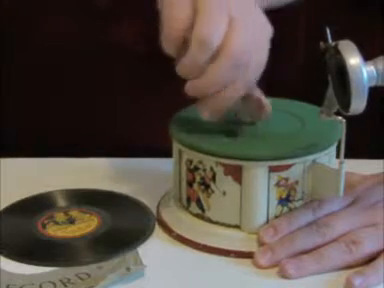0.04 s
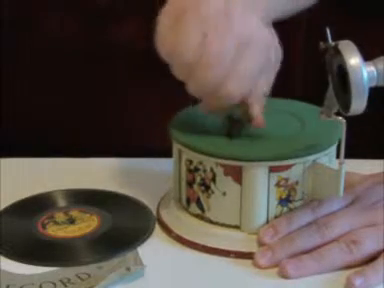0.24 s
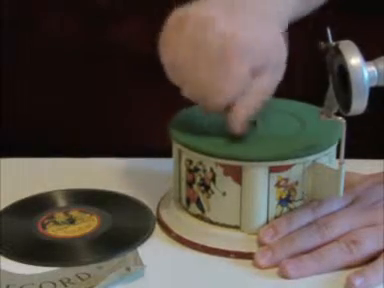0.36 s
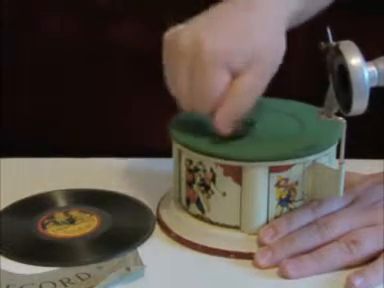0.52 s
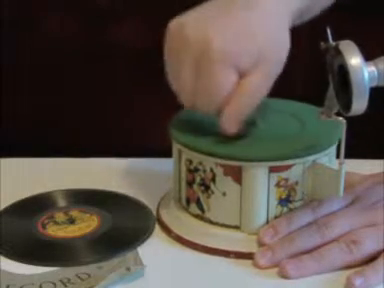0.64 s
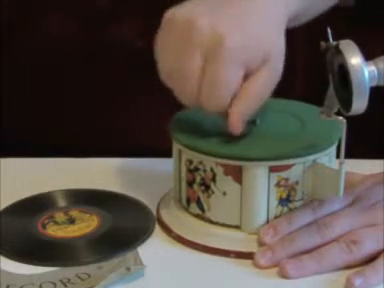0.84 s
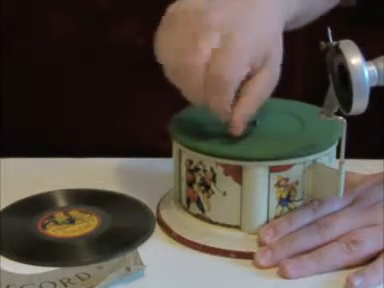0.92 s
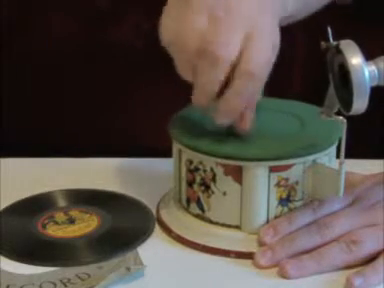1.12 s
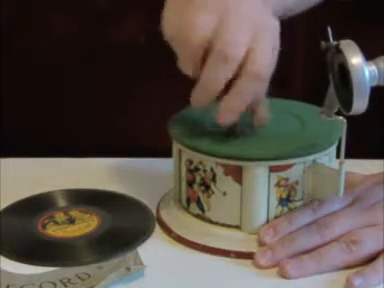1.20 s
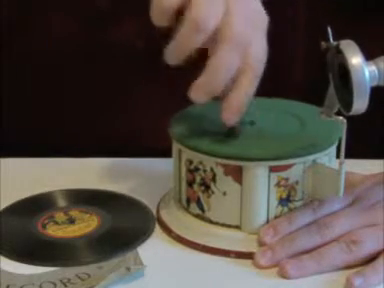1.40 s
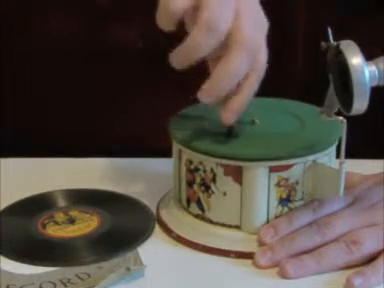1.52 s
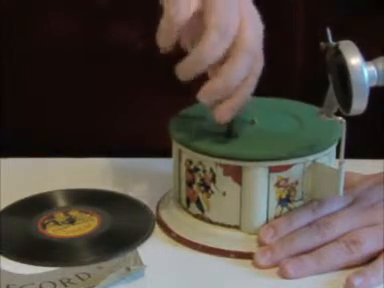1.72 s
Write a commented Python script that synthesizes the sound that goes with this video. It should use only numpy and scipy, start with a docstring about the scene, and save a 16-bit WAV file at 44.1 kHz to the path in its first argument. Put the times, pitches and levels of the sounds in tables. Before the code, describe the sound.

Sharp, clanking ratchet clicks and soft key knocks as a tin toy gramophone is wound.

```python
"""Sharp tin clanks, close by: a hand winds the spring motor of a toy gramophone on a table.
One twist of the key drops the pawl over four ratchet teeth; each snap rings the tin case and fills
the small, live room. Before and after, the fingers shift their grip and the loose key knocks softly,
while the toy bumps the table now and then. Mains hum and faint hiss lie underneath.
Nearly mono, with a faint, uneven stereo spread."""
import sys
import numpy as np
from scipy import signal
from scipy.fft import rfft, irfft, next_fast_len
from scipy.io import wavfile

SR = 44100
rng = np.random.default_rng(int(sys.argv[2]) if len(sys.argv) > 2 else 0)


def dump(signal):
    """Clip the signal to [-1, 1] and save it as 16-bit WAV at the path in sys.argv[1]."""
    limited = np.clip(np.atleast_2d(signal).T, -1, 1)
    pcm = np.round(limited * 32767).astype(np.int16)
    wavfile.write(sys.argv[1], SR, pcm)


N = 77175
TAIL = 32768  # samples given to one sound to die away
SNAP_RISE_S, SNAP_HOLD_S, SNAP_T60_S = 0.0023, 0.0045, 0.013


def ratchet():
    """The pawl snaps off each tooth: a crack, a clank and a ring, changing colour as the wheel turns."""
    # The second tooth catches twice. Each row: start in seconds, direct and room gains in dB,
    # low clank in Hz and its dB, high clank in Hz and its dB, then a tint in dB at each of tint_hz.
    snaps = [(0.2077, -16, -18.5, 1524, -24, 2200, -29, -5, 4, -4.5, 5, 5.5, 3.5, 0.65, -1.9, -3.1),
             (0.3368, -19.5, -24.5, 518, -36, 2083, -28.5, 10, 7, 0, -6, 11, 0, 2.1, -0.13, -3.1),
             (0.353, -20, -21, 1580, -31, 3198, -23, -4, 7.5, -4, 3, -1, 3.5, 2.1, -0.81, -4.2),
             (0.4613, -13.5, -19, 757, -22.5, 3960, -29, -0.5, -0.5, -2, -2, -0.5, 0.5, 0.41, 0.32, -0.97),
             (0.6100, -17.5, -19, 675, -26, 4780, -25, 0.5, 0.5, 0, -4, -6, -1, 0.4, -0.77, 1)]
    # Where the tint of a snap is set, in Hz.
    tint_hz = [330, 480, 700, 1050, 1900, 2700, 3900, 6500, 10200]
    # Colour of the direct sound. Each row: frequency in Hz, gain in dB.
    direct_colour = [(500, 3), (4000, 2), (5600, -5), (6800, 2), (8200, -18), (10200, 2.5), (12000, -6.5)]
    # Colour of the snapped tin case. Each row: frequency in Hz, gain in dB.
    case_colour = [(59, -46), (100, -40), (135, -24), (179, -28), (368, -22.5), (477, -11.5), (517, -11.5),
                   (644, -1.5), (698, -12.5), (756, -5.5), (924, -4), (1040, -7), (1220, -5), (2230, -6.5),
                   (2470, -11.5), (3830, -5), (5280, -11.5), (10200, -8.5), (12000, -14.5), (15600, -41),
                   (22000, -120)]
    clank_t60_s, ring_db = 0.026, -18.5
    sheet_hz = rng.uniform(4280, 12150, size=44)
    out = np.zeros(N)
    for start, direct_db, room_db, low_hz, low_db, high_hz, high_db, *tint_db in snaps:
        chatter = contact(SNAP_RISE_S, SNAP_HOLD_S, SNAP_T60_S)
        direct = coloured(chatter, lambda hz: direct_db + along(direct_colour, hz))
        crack = coloured(direct + amp(room_db) * room(), lambda hz: along(case_colour, hz))
        clank = amp(low_db) * mode(low_hz, clank_t60_s, SNAP_RISE_S)
        clank += amp(high_db) * mode(high_hz, clank_t60_s, SNAP_RISE_S)
        ringing = amp(room_db + ring_db) * (case_ring() + shimmer(sheet_hz))
        tint = list(zip(tint_hz, tint_db))
        add(out, start, coloured(crack + clank + ringing, lambda hz: along(tint, hz)))
    return out


def case_ring(scatter_db=2):
    """The modes of case and spring, struck a little differently each time."""
    # Each row: pitch in Hz, relative level in dB, seconds to fall 60 dB.
    modes = [(480.7, -19.5, 0.66), (551, -20.5, 0.55), (682, -12.5, 0.23), (751.6, -2.5, 0.25),
             (1051.2, -2, 0.29), (1430, -12.5, 0.15), (1548, -2, 0.15), (1903, 2.5, 0.083),
             (2149, -21, 1.0), (2275, 0.5, 0.17), (3154, -7.5, 0.35), (3910, -19, 0.66),
             (3890, -10.5, 0.44), (3990, -16, 0.4), (4345, -15, 0.31), (7180, -4.5, 0.19), (10600, -14, .2)]
    return sum(amp(db + scatter_db * rng.standard_normal()) * mode(hz, t60_s, SNAP_RISE_S)
               for hz, db, t60_s in modes)


def shimmer(pitches_hz):
    """The thin tin sheet's high modes, each snap sharing its energy among them anew."""
    return amp(-15) * sum(rng.standard_normal() * mode(hz, t60_s=0.23, rise_s=0.0061)
                          for hz in pitches_hz)


def key_knocks():
    """Fingers nudge the slack key: dull knocks on the same case, each leaving one tone ringing."""
    # Each row: start in seconds, gain in dB, rise in seconds, brightness in dB per octave,
    # the tin's tone in Hz, its gain against the knock in dB.
    knocks = [(0.061, -41, 0.0058, -2, 490.5, -11.5), (0.161, -31.5, 0.0035, -1, 612.4, -22.5),
              (0.832, -37.5, 0.0014, 1, 581, -19.5), (0.848, -42.5, 0.0044, 0, 579.5, -10),
              (1.013, -41.5, 0.0047, -2.5, 310, -21.5), (1.111, -36, 0.0024, 0.5, 809, -23),
              (1.215, -41, 0.0027, 1.5, 611, -15), (1.268, -48, .004, -0.5, 3130, -22),
              (1.316, -48.5, 0.0046, -3, 547, -14.5), (1.451, -42, 0.0037, -2.5, 545, -15.5),
              (1.494, -59, 0.0068, 7, 553, -13), (1.54, -42, 0.002, -2, 474, -22.5),
              (1.629, -48, 0.0031, 1, 606, -15), (1.682, -47.5, 0.0033, 2, 575, -14),
              (1.701, -39, 0.0022, 0.5, 1840, -23), (1.733, -43.5, 0.0028, 2.5, 580, -19)]
    # Colour of the softly knocked case. Each row: frequency in Hz, gain in dB.
    knock_colour = [(60, -29), (140, -10.5), (220, -10.5), (380, -6), (490, 5), (590, 3), (680, 1),
                    (850, -0.5), (1150, -3.5), (2100, -8), (2600, -18), (3150, -14.5), (5000, -40.5),
                    (12000, -31.5)]
    room_db, ring_db, pivot_hz = -6, -22, 750
    out = np.zeros(N)
    for start, db, rise_s, slope_db, tone_hz, tone_db in knocks:
        chatter = contact(rise_s, hold_s=0.0027, t60_s=0.028)
        knock = chatter + amp(room_db) * room() + amp(ring_db) * case_ring()
        dull_knock = coloured(knock, lambda hz: along(knock_colour, hz)
                              + slope_db * np.log2(np.maximum(hz, 250) / pivot_hz))
        tone = amp(tone_db) * mode(tone_hz, t60_s=0.43, rise_s=rise_s)
        add(out, start, amp(db) * (dull_knock + tone))
    return out


def table_bumps():
    """The twisting hand rocks the toy on the table: faint low thuds."""
    # Each row: start in seconds, level in dB.
    bumps = [(0.087, -61), (0.302, -52), (0.383, -61), (0.487, -55), (0.611, -59), (0.712, -61),
             (0.843, -61), (1.02, -62.5)]
    out = np.zeros(N)
    for start, db in bumps:
        add(out, start, amp(db) * mode(hz=142, t60_s=0.14, rise_s=0.005))
    return out


def room():
    """The small room answers one contact: it fills, then each frequency dies at its own speed."""
    # Each row: frequency in Hz, seconds to fall 60 dB.
    decay_times = [(150, 0.46), (530, 0.43), (1400, 0.38), (3700, .34), (7000, .28), (11000, 0.19)]
    first_wall_s, fill_s = 0.007, 0.0047
    hz, t, spectrum = signal.stft(rng.standard_normal(TAIL), SR, nperseg=256)
    fade = amp(-60 * np.maximum(t - first_wall_s - fill_s, 0) / along(decay_times, hz)[:, None])
    reverb = signal.istft(spectrum * fade, SR, nperseg=256)[1][:TAIL]
    build_up = np.clip((np.arange(TAIL) / SR - first_wall_s) / fill_s, 0, 1)
    return reverb * build_up


def hum_and_hiss():
    """Steady mains hum and faint hiss under everything."""
    # Mains lines. Each row: frequency in Hz, rms level in dB.
    hum_lines = [(48.4, -81), (150.7, -76.5), (247.6, -77), (349.9, -80)]
    # Colour of the hiss. Each row: frequency in Hz, gain in dB.
    hiss_colour = [(18, -12), (30, -10), (95, -21), (149, -4.5), (197, -35), (240, -14), (301, -5.5),
                   (578, -4.5), (885, -6.5), (1050, -8), (12000, -21.5), (15600, -44), (22000, -120)]
    t = np.arange(N) / SR
    hum = sum(np.sqrt(2) * amp(db) * np.sin(2 * np.pi * (hz * t + rng.random())) for hz, db in hum_lines)
    hiss = coloured(rng.standard_normal(N), lambda hz: along(hiss_colour, hz) - 50)
    return hum + hiss


def contact(rise_s, hold_s, t60_s):
    """The brief chatter of two parts meeting."""
    t = np.arange(TAIL) / SR
    decay = amp(-60 * np.maximum(t - hold_s, 0) / t60_s)
    return rng.standard_normal(TAIL) * np.minimum(t / rise_s, 1) * decay


def mode(hz, t60_s, rise_s):
    """One struck resonance."""
    t = np.arange(TAIL) / SR
    envelope = np.minimum(t / rise_s, 1) * amp(-60 * t / t60_s)
    return envelope * np.sin(2 * np.pi * (hz * t + rng.random()))


def amp(db):
    """Decibels to gain."""
    return 10 ** (np.asarray(db) / 20)


def along(points, hz):
    """A curve of (Hz, value) points, read on a log frequency axis."""
    point_hz, values = np.transpose(points)
    return np.interp(np.log(hz + 1), np.log(point_hz + 1), values)


def coloured(sound, gain_db):
    """A sound through a causal filter whose gain in dB is a function of frequency."""
    size = 2 * next_fast_len(len(sound))
    hz = np.fft.rfftfreq(size, 1 / SR)
    cepstrum = irfft(np.log(amp(gain_db(hz))), size)
    # Fold to minimum phase, so nothing rings ahead of a strike.
    cepstrum[1:size // 2] *= 2
    cepstrum[size // 2 + 1:] = 0
    return irfft(rfft(sound, size) * np.exp(rfft(cepstrum)), size)[:len(sound)]


def add(track, start_s, sound):
    """Mix a sound into the track at its start time."""
    part = track[round(start_s * SR):][:len(sound)]
    part += sound[:len(part)]


def scene():
    """Ratchet, key, table and quiet room: nearly mono, with a faint, uneven stereo spread."""
    # Colour of the faint side signal. Each row: frequency in Hz, relative gain in dB.
    side_colour = [(60, -29), (110, -33), (200, -42), (360, -64), (650, -24), (1170, -11.5), (2120, -42.5),
                   (3830, -10.5), (6940, -47), (12600, -9)]
    mid = ratchet() + key_knocks() + table_bumps() + hum_and_hiss()
    scatter = contact(SNAP_RISE_S, SNAP_HOLD_S, SNAP_T60_S)
    smeared = signal.fftconvolve(mid, scatter / np.linalg.norm(scatter))[:N]
    side = coloured(smeared, lambda hz: along(side_colour, hz) - 4.5)
    return np.array([mid + side, mid - side])


def record(dry):
    """The top treble is cut off at a steep band limit."""
    top_hz = 12150
    size = next_fast_len(N + SR // 2)
    hz = np.fft.rfftfreq(size, 1 / SR)
    low_pass = 1 / np.sqrt(1 + (hz / top_hz) ** 160)
    return irfft(rfft(dry, size) * low_pass, size)[:, :N]


dry = scene()
out = record(dry)
dump(out)
```